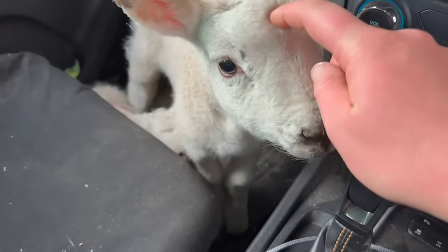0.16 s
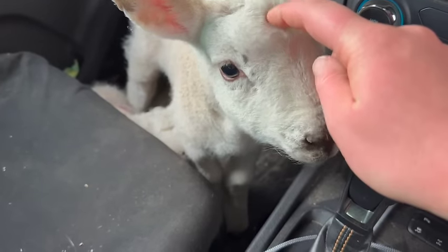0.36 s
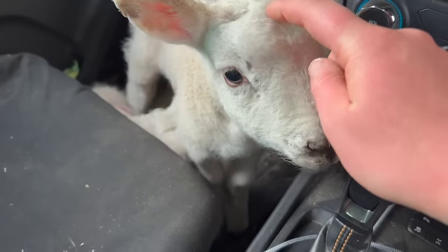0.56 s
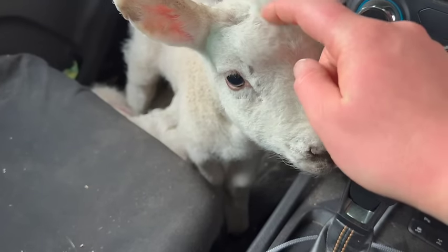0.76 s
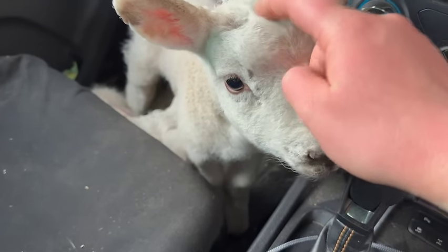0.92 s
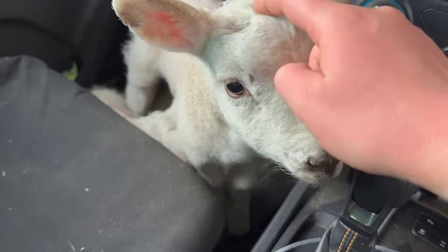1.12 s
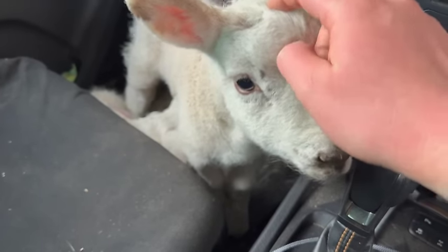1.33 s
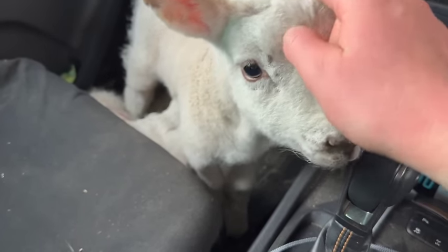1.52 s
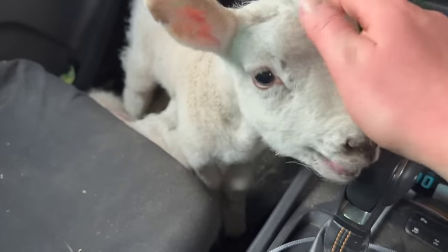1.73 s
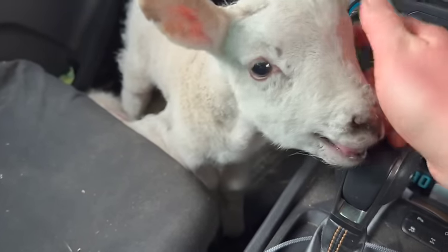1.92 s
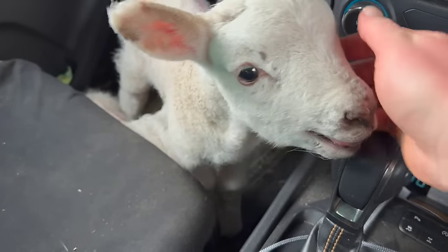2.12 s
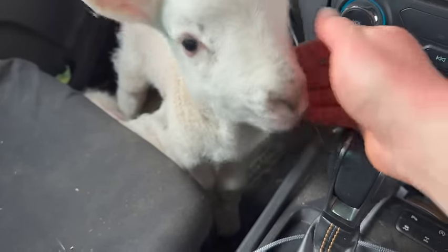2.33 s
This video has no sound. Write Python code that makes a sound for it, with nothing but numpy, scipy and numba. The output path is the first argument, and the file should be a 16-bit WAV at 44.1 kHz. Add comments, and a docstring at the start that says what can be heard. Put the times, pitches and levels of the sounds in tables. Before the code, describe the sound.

One loud bleat from a nearby lamb, starting hoarse and ending in a quaver.

```python
"""A lamb smacks its mouth open and bleats, a hand's length from a phone in a parked vehicle's cab.
Vocal pulses and breath ring a moving throat and mouth; the call starts hoarse, breaks into wavers
at the end, and its breath puffs on the microphone. Fingers stroke the wool.
The cab rumbles faintly and echoes very briefly."""
import sys
import numpy as np
from scipy import signal
from scipy.fft import rfft, irfft
from scipy.io import wavfile
from scipy.ndimage import uniform_filter1d
from numba import njit

SR = 44100
rng = np.random.default_rng(int(sys.argv[2]) if len(sys.argv) > 2 else 0)


def transcribe(signal):
    """Save signal, clipped to [-1, 1], as a 16-bit WAV file at the path in sys.argv[1]."""
    frames = np.atleast_2d(signal).T
    limited = np.clip(frames, -1, 1)
    pcm = np.round(limited * 32767).astype(np.int16)
    wavfile.write(sys.argv[1], SR, pcm)


N = 104517
T = np.arange(N) / SR
HZ = np.maximum(np.arange(N // 2 + 1) * SR / N, 1)


def undb(db):
    """Decibels to gain."""
    return 10 ** (np.asarray(db) / 20)


def curve(table, column=1):
    """One column of a time table, per sample."""
    rows = np.array(table, float)
    return np.interp(T, rows[:, 0], rows[:, column])


def over_hz(table):
    """A frequency table, per FFT bin."""
    rows = np.array(table, float)
    return np.interp(np.log(HZ), np.log(np.maximum(rows[:, 0], 1)), rows[:, 1])


def unit(x):
    """Scale to rms 1."""
    return x / np.sqrt(np.mean(x ** 2))


def walk(rate_hz):
    """Smooth random wander, rms 1."""
    size = int(SR / rate_hz)
    return unit(uniform_filter1d(uniform_filter1d(rng.standard_normal(N), size), size))


def highpass(x, hz):
    """Second-order high-pass."""
    return signal.sosfilt(signal.butter(2, hz, "high", fs=SR, output="sos"), x)


@njit
def bandpass(x, hz, width_hz):
    """State-variable filter, per-sample centre and width, gain 1 at the centre."""
    y, band_state, low_state = np.empty(len(x)), 0., 0.
    for i in range(len(x)):
        g, damping = np.tan(np.pi * hz[i] / SR), width_hz[i] / hz[i]
        band = (band_state + g * (x[i] - low_state)) / (1 + g * (g + damping))
        band_state, low_state = 2 * band - band_state, low_state + 2 * g * band
        y[i] = damping * band
    return y


def formant(x, hz, width_hz):
    """Steep resonance, equally loud at any width."""
    hz, width_hz = hz + 0 * T, np.maximum(width_hz + 0 * T, 50)
    return bandpass(bandpass(x, hz, width_hz), hz, 2 * width_hz) * np.sqrt(SR / 2 / width_hz)


def tremble(x, hz, width_hz):
    """Soft-tissue resonance: strength and centre flutter independently."""
    flutter_db, detune, rate_hz = 2.5, .014, 20
    return undb(flutter_db * walk(rate_hz)) * formant(x, hz * (1 + detune * walk(rate_hz)), width_hz)


def tremble_bank(x, modes):
    """Trembling resonances of alternating sign."""
    return sum(undb(db) * tremble(x, hz, width) * (-1) ** k for k, (hz, width, db) in enumerate(modes))


def stereo_noise(colour):
    """Coloured noise at two ports: the right lags a little, a small part differs."""
    side_db, quadrature_db = -23, -9
    gain = undb(over_hz(colour))
    mid, side = (unit(irfft(rfft(rng.standard_normal(N)) * gain, N)) for _ in range(2))
    side = undb(side_db) * side + undb(quadrature_db) * signal.hilbert(mid).imag
    return np.array([mid - side, mid + side])


def cab_rumble():
    """Low, flickering noise of the cab, thinner under the call."""
    # envelope (time [s], level [dB])
    levels = [(0, -57), (.18, -65), (.3, -60.5), (.45, -70), (.97, -65.5), (1.11, -74), (1.37, -61.5),
              (1.55, -57.5), (1.63, -50.5), (1.72, -70), (1.87, -69.5), (2.37, -59)]
    # spectrum (frequency [Hz], relative density [dB])
    colour = [(15, -6.5), (25, -21), (65, -1), (97, -16.5), (135, -10), (194, -20.5), (537, -28.5),
              (700, -28), (910, -38), (1540, -120)]
    flicker_db = 3.5
    return stereo_noise(colour) * undb(curve(levels) - flicker_db * walk(rate_hz=3.5))


def wool_rub():
    """Friction noise of fingers stroking wool."""
    # envelope (time [s], level [dB])
    levels = [(0, -61.5), (.1, -63), (.22, -68.5), (.45, -86), (.88, -84), (.94, -73.5), (1.1, -83),
              (1.27, -73.5), (1.58, -70), (1.7, -77)]
    # spectrum (frequency [Hz], relative density [dB])
    colour = [(120, -38), (200, 5), (529, -1), (696, -17), (1040, -5), (1270, -10.5), (1480, -1),
              (1680, -13.5), (2650, -10), (3310, -23.5), (5040, -14), (12200, -39), (16000, -24)]
    flicker_db = 1.4
    return stereo_noise(colour) * undb(curve(levels) + flicker_db * walk(rate_hz=23))


def mouth_smacks():
    """Wet clicks ring the closed mouth and leave a short sticky crackle."""
    # clicks (time [s], gain [dB])
    clicks = [(1.512, -52.5), (1.5251, -40)]
    # mouth modes (frequency [Hz], relative level [dB], t60 [s])
    modes = [(340, 5.5, 0.046), (1090, 5.5, 0.025), (1480, 12.5, 0.0089), (2290, -2, 0.035),
             (4580, -6, 0.011)]
    wet_db, wet_decay_s, wet_hz, wet_width_hz = -5, .017, 2500, 4000
    out = 0
    for start_s, gain_db in clicks:
        age_s = np.maximum(T - start_s, 0)
        ring = sum(undb(db - 60 * age_s / t60) * np.sin(2 * np.pi * hz * age_s) for hz, db, t60 in modes)
        wet = bandpass(rng.standard_normal(N), wet_hz + 0 * T, wet_width_hz + 0 * T)
        wet *= undb(wet_db) * np.exp(-age_s / wet_decay_s)
        out = out + undb(gain_db) * (ring / 2 + wet) * (T > start_s)
    return out


def vocal_folds(pitch_hz, onset_s):
    """Slightly uneven pulses, and air noise gated by each cycle."""
    jitter, grain, air_from_hz = .0024, .0008, 2300
    hz = pitch_hz * (1 + jitter * walk(rate_hz=60) + grain * walk(rate_hz=300))
    cycles = np.cumsum(hz) / SR
    cycles -= cycles[int(onset_s * SR)]  # a pulse falls on the onset
    pulses = sum(np.cos(2 * np.pi * k * cycles) * (k * hz < 20000) for k in range(1, 68))
    air = np.exp(-(cycles % 1) / .7) * rng.standard_normal(N)
    return unit(pulses), unit(highpass(highpass(air, air_from_hz), air_from_hz))


def air_leak_db(level_db, onset_s):
    """More air leaks where the voice is weak, starts hoarse or cracks."""
    # voice cracks (time [s], extra air [dB])
    cracks = [(1.893, 12), (1.982, 13), (2.072, 14), (2.17, 12)]
    base_db, weak_db, weak_below_db = -27, 20, -21
    rasp_db, rasp_end_s, crack_s = 13, 1.79, .011
    weak = np.clip((weak_below_db - level_db) / 10, 0, 1)
    hoarse = np.clip((rasp_end_s - T) / (rasp_end_s - onset_s) * 2, 0, 1)
    crack_db = sum(db * np.exp(-((T - at_s) / crack_s) ** 2) for at_s, db in cracks)
    return base_db + weak_db * weak + rasp_db * hoarse + crack_db


def vocal_tract(source, pulses, air, age_s):
    """Moving and trembling resonances in parallel; a notch dulls the band near 8 kHz."""
    # tract motion (time [s], mouth gain [dB], mouth centre [Hz], jaw gain [dB], jaw centre [Hz],
    # jaw width [Hz], chest gain [dB], treble gain [dB])
    motion = [(1.597, -8.5, 3800, -10.5, 1060, 400, -25.5, -8),
              (1.637, 2.5, 4260, -11, 1614, 404, -13, -13), (1.669, -2.5, 4200, -12, 1040, 257, -23.5, -16),
              (1.73, 5.5, 3863, -7, 1246, 300, -20.5, -8), (1.79, 5.5, 3635, -3, 1275, 283, -18, -8.5),
              (1.95, 3, 3630, -2.5, 1318, 292, -23.5, -15), (2.06, 1, 3685, -1.5, 1310, 330, -24.5, -10),
              (2.1, -3.5, 3710, -1.5, 1408, 343, -36, -16), (2.18, 6.5, 3646, 2.5, 1330, 356, -24.5, -10.5),
              (2.259, -0.5, 3540, 1.5, 1303, 378, -20, -19.5),
              (2.3, -7.5, 3670, -5.5, 1266, 393, -17.5, -25), (2.37, 6, 3370, 11, 1110, 312, -8, -17)]
    # throat resonances (centre [Hz], width [Hz], gain [dB])
    throat_modes = [(1975, 380, -26.5), (4770, 360, -10.5), (6113, 300, -20), (6933, 107, -23.5)]
    # treble resonances (centre [Hz], width [Hz], gain [dB])
    treble_modes = [(11080, 2800, -5), (13450, 510, -16), (14700, 850, -10)]
    tongue_ratio, tongue_db, treble_air_db, throat_air_db = .768, -11.5, -5, -15
    lip_start_hz, lip_open_hz, lip_opening_s = 8700, 9680, .062
    notch_hz, notch_width_hz = 8100, 2200
    mouth_db, mouth_hz, jaw_db, jaw_hz, jaw_width_hz, chest_db, treble_db = (
        curve(motion, column) for column in range(1, 8))
    mouth = formant(source, mouth_hz, width_hz=333)
    tongue = undb(tongue_db) * tremble(source, tongue_ratio * mouth_hz, width_hz=534)
    jaw = undb(jaw_db) * formant(source, jaw_hz, jaw_width_hz)
    chest = undb(chest_db) * formant(pulses, hz=440, width_hz=830)
    airy = source + undb(treble_air_db) * air
    lip_hz = lip_open_hz - (lip_open_hz - lip_start_hz) * np.exp(-(age_s / lip_opening_s) ** 2)
    lips = tremble(airy, lip_hz, width_hz=990)
    treble = undb(treble_db) * (lips - tremble_bank(airy, treble_modes))
    throat = tremble_bank(source + undb(throat_air_db) * air, throat_modes)
    voice = undb(mouth_db) * (mouth - tongue) + jaw - chest + treble - throat
    return voice - bandpass(voice, notch_hz + 0 * T, notch_width_hz + 0 * T)


def bleat():
    """Pulses and air ring the tract; the result is levelled to the call's contour."""
    # call contour (time [s], pitch [Hz], level [dB])
    contour = [(1.597, 235.3, -34.5), (1.609, 245, -20.5), (1.631, 262.3, -14.5), (1.647, 258.8, -11),
               (1.665, 257, -17.5), (1.699, 293.8, -8), (1.753, 301.6, -15), (1.785, 324.7, -13),
               (1.841, 324.6, -15.5), (1.885, 333.6, -13), (1.901, 322, -17), (1.965, 324.3, -15.5),
               (1.985, 315.7, -20), (2.007, 321.1, -17), (2.055, 325.2, -19), (2.085, 311.4, -21),
               (2.155, 319.3, -18.5), (2.191, 298.4, -23), (2.216, 254.8, -33.5), (2.24, 297.9, -27.5),
               (2.257, 301, -26.5), (2.272, 267.7, -34), (2.295, 241.5, -48.5), (2.311, 260.3, -35.5),
               (2.333, 290, -31), (2.37, 247.8, -38)]
    onset_s, attack_s, shimmer_db = 1.599, .00094, .5
    age_s = np.maximum(T - onset_s, 0)
    pitch_hz = uniform_filter1d(curve(contour, column=1), size=300)
    level_db = curve(contour, column=2)
    pulses, air = vocal_folds(pitch_hz, onset_s)
    source = pulses * undb(shimmer_db * walk(rate_hz=90)) + air * undb(air_leak_db(level_db, onset_s))
    voice = vocal_tract(source, pulses, air, age_s)
    running_rms = np.sqrt(uniform_filter1d(uniform_filter1d(voice ** 2, size=700), size=700))
    return voice / running_rms * undb(level_db) * np.clip(age_s / attack_s, 0, 1)


def breath_puff():
    """Breath buffets the microphone as the call ends."""
    # envelope (time [s], level [dB])
    levels = [(2.08, -73), (2.19, -43), (2.22, -45), (2.25, -45.5), (2.31, -57), (2.37, -66)]
    # spectrum (frequency [Hz], relative density [dB])
    colour = [(15, -38), (25, -1), (75, 4.5), (135, -9), (220, -13.5), (290, -24), (480, -120)]
    return stereo_noise(colour) * undb(curve(levels))


def mic_ports(x):
    """Two ports hear the near lamb, each with its own phase and level."""
    # port phase (frequency [Hz], left lead [rad])
    phase = [(320, -.3), (650, .9), (970, -1), (1290, -.3), (2100, .1), (3250, 1.2), (4000, .4), (6370, .1),
             (7410, 2.9), (8270, 3.2), (12900, 1.4), (14000, .3)]
    # port balance (frequency [Hz], left over right [dB])
    balance = [(320, -.5), (970, 5.5), (1290, -1), (3400, 1.5), (4700, -3), (8120, .5)]
    half = np.exp(.5j * over_hz(phase)) * undb(over_hz(balance) / 2)
    return np.array([irfft(rfft(x) * half, N), irfft(rfft(x) / half, N)])


def cab_echo(x):
    """Dense, very short echo, different at each port."""
    echo_db, from_hz, t60_s = -17, 500, .08
    age_s = np.arange(int(.15 * SR)) / SR
    decay = undb(-60 * age_s / t60_s)
    tails = [highpass(rng.standard_normal(len(age_s)), from_hz) * decay for _ in range(2)]
    return np.array([signal.fftconvolve(x, h / np.sqrt(np.sum(h ** 2)))[:N] for h in tails]) * undb(echo_db)


def scene():
    """Lamb, echo, rumble, breath, rubbing and microphone hiss."""
    hiss_db = -84
    lamb = bleat() + mouth_smacks()
    noises = cab_rumble() + breath_puff() + wool_rub()
    return mic_ports(lamb) + cab_echo(lamb) + noises + undb(hiss_db) * rng.standard_normal((2, N))


def record(dry):
    """The phone rounds the highest peaks and cuts the top."""
    ceiling, top_hz = .9, 15800
    lowpass = signal.ellip(10, .2, 80, top_hz, fs=SR, output="sos")
    return signal.sosfilt(lowpass, ceiling * np.tanh(dry / ceiling))


dry = scene()
out = record(dry)
transcribe(out)
```